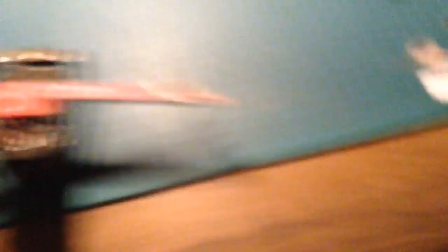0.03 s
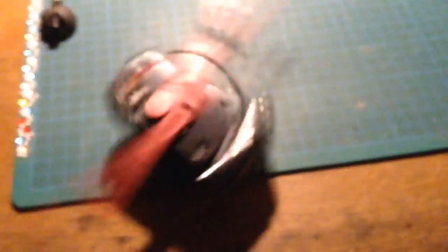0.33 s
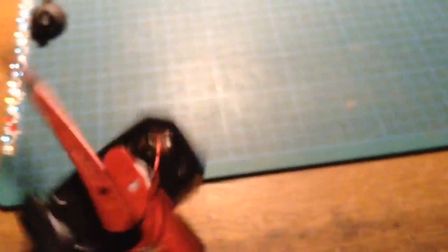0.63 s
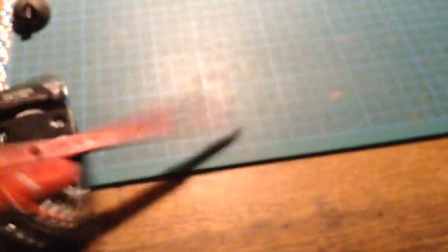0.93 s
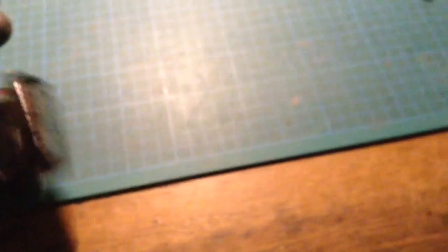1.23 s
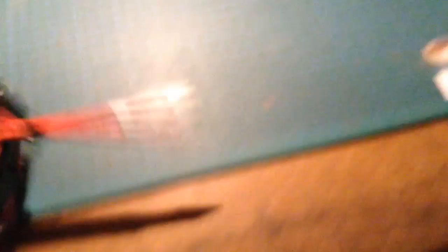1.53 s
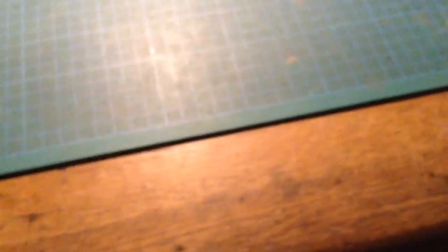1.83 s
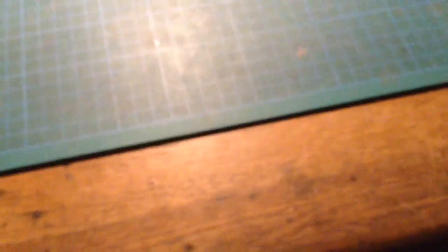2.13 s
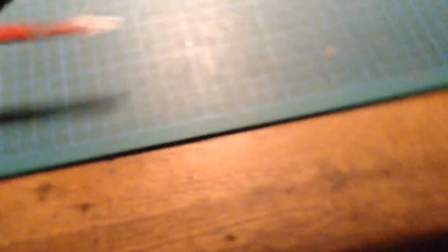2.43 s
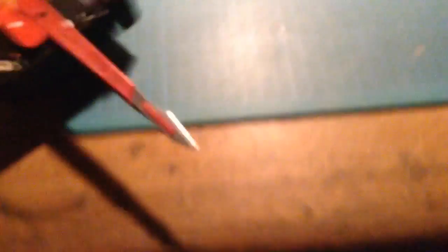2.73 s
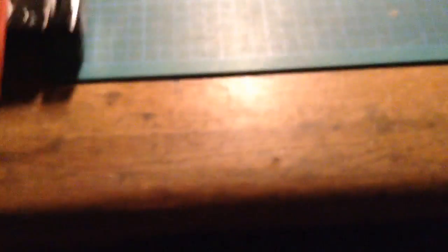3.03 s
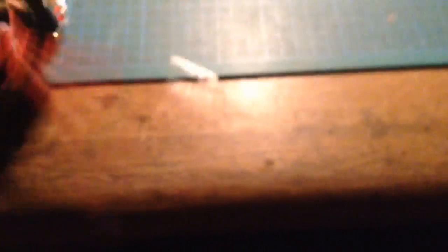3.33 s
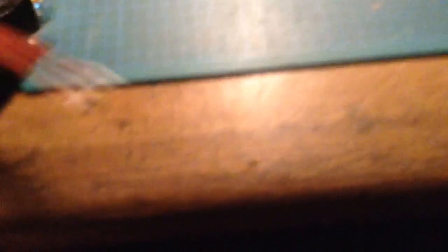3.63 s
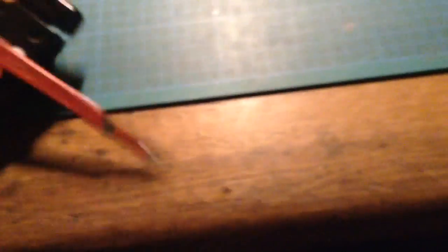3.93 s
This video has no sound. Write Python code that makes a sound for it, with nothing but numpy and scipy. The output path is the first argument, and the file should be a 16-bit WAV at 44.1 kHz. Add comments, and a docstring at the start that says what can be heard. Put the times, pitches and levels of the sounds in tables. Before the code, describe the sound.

A small motor whirrs and grinds while its plastic body knocks and clatters on a table.

```python
"""Small motor skidding on a table

A small electric motor with a plastic rotor arm spins and skids on a table, close to the microphone
in a small room. Its gears whirr and grind and its brushes fizz once a turn, the speed sagging and
recovering. The casing chatters on the table, and the arm and body knock irregularly, from dull
thumps to sharp plastic cracks."""
import sys
import numpy as np
from scipy import signal
from scipy.fft import rfft, irfft, next_fast_len
from scipy.io import wavfile
from scipy.ndimage import map_coordinates

SR = 44100
rng = np.random.default_rng(int(sys.argv[2]) if len(sys.argv) > 2 else 0)


def store_pcm(level_fs):
    """Save levels as 16-bit WAV."""
    pcm = np.round(np.clip(level_fs, -1, 1) * 32767).astype(np.int16)
    wavfile.write(sys.argv[1], SR, np.atleast_2d(pcm).T)


N = 176400


# The motor's pace. Each row: time in seconds, turns per second.
MOTOR_SPEED = [(0, 212), (.06, 210), (.12, 219), (.17, 221), (.22, 216), (.27, 204), (.31, 204), (.37, 211),
               (.44, 194), (.52, 182), (.59, 187), (.64, 178), (.73, 189), (.79, 182), (.89, 176),
               (1.04, 201), (1.19, 199), (1.25, 187), (1.33, 190), (1.44, 205), (1.5, 208), (1.61, 187),
               (1.68, 202), (1.73, 196), (1.78, 202), (1.85, 200), (1.97, 211), (2.03, 212), (2.13, 183),
               (2.2, 184), (2.3, 189), (2.45, 192), (2.69, 174), (2.77, 192), (2.89, 195), (3.0, 211),
               (3.1, 219), (3.28, 194), (3.35, 167), (3.43, 173), (3.51, 187), (3.62, 192), (3.81, 169),
               (3.92, 175), (4, 176)]
def motor_turns(flutter=.005):
    """Turns made so far by the motor, whose speed sags, recovers and flutters slightly."""
    return np.cumsum(curve(MOTOR_SPEED) * (1 + flutter * wobble(40))) / SR


# The whirr, close up. Each row: time in seconds, level in dB.
WHIRR_LEVEL = [(0.0, -41), (0.15, -42), (0.22, -40), (0.34, -39), (0.5, -33), (0.58, -37), (0.72, -37),
               (0.84, -35.5), (1.04, -40), (1.15, -38), (1.24, -39), (1.47, -34), (1.61, -35.5),
               (1.63, -43), (1.665, -43), (1.7, -36.5), (1.94, -38), (2.07, -37), (2.22, -36.5),
               (2.29, -40), (2.43, -39), (2.49, -41), (2.7, -41), (2.94, -44), (3.02, -42.5), (3.11, -38),
               (3.19, -40), (3.27, -38), (3.45, -42), (3.53, -40), (3.58, -38), (3.69, -40), (3.74, -46),
               (3.88, -48), (3.99, -46)]
# Its tone. Each row: frequency in Hz, level in dB.
WHIRR_SPECTRUM = [(100, -78), (1500, -26), (3000, -47), (4000, -6.5), (4700, 1.5), (5400, 3.5), (6300, 0.5),
                  (7600, -4.5), (8600, -12.5), (11000, -7), (16000, -13.5)]
def gear_whirr(turns, level_db=-0.5, tick_db=-9, flicker_db=2.46):
    """Gear teeth rub and tick finely in a bright whirr whose level flickers."""
    teeth = rubbing(turns, noise_share=.48, pulse_db=2)
    teeth += amp(tick_db) * ticks(per_s=73, t60=0.005)
    whirr = swirl(coloured(teeth, WHIRR_SPECTRUM), depth_db=2.5)
    return whirr * amp(curve(WHIRR_LEVEL) + level_db + flicker_db * wobble(30.3))


# The grind under the whirr. Each row: time in seconds, level in dB.
GRIND_LEVEL = [(0.0, -42), (0.27, -44), (0.47, -38), (0.65, -38), (0.73, -42), (1.09, -40), (1.19, -45),
               (1.26, -45), (1.31, -40), (1.38, -39), (1.65, -46), (1.83, -40), (2.02, -42), (2.22, -40),
               (2.37, -43), (2.62, -44), (2.93, -48), (3.28, -45), (3.51, -45), (3.6, -42), (3.86, -54),
               (3.99, -55)]
# Its tone. Each row: frequency in Hz, level in dB.
GRIND_SPECTRUM = [(60, -60), (110, -31), (150, -48), (205, 0.5), (400, -24), (900, -13.5), (1700, 4.5),
                  (2300, -4), (3000, 2.5), (3900, 5.5), (5000, -10.5), (9000, -13)]
def gear_grind(turns, level_db=2):
    """The gears also rub with a lower, rougher grind."""
    grind = coloured(rubbing(turns, noise_share=.56, pulse_db=2), GRIND_SPECTRUM)
    return swirl(grind, depth_db=4) * amp(curve(GRIND_LEVEL) + level_db)


def gear_mesh(turns, teeth=26, width_hz=800, level_db=-7, surge_db=1.5, pulse_db=3):
    """The meshing teeth rasp, pulsing each turn, in a band that rises and falls with the speed."""
    phase = 2 * np.pi * teeth * turns
    rasp = wobble(width_hz) * np.cos(phase) + wobble(width_hz) * np.sin(phase)
    swell = amp(surge_db * wobble(18) + pulse_db * np.cos(2 * np.pi * turns))
    return unit(rasp * swell) * amp(curve(WHIRR_LEVEL) + level_db)


# The brushes, close up. Each row: time in seconds, level in dB.
FIZZ_LEVEL = [(0.0, -37.5), (0.43, -38), (0.69, -45), (0.79, -39), (1.07, -37.5), (1.31, -41), (1.46, -43),
              (1.58, -52), (1.65, -43), (1.7, -38.5), (1.8, -42), (2.0, -41.5), (2.22, -39), (2.31, -42),
              (2.46, -42), (2.57, -46), (3.15, -44), (3.44, -48.5), (3.58, -39), (3.61, -40), (3.7, -59),
              (3.77, -55), (3.99, -48)]
# Their tone. Each row: frequency in Hz, level in dB.
FIZZ_SPECTRUM = [(100, -85), (3000, -17), (7000, -3.5), (9000, -7.5), (10500, -2), (12000, 1.5),
                 (13300, 4.5), (14700, 4.5), (16000, 3)]
def brush_fizz(turns, level_db=1):
    """The brushes rub over the same contacts each turn, fizzing above the gears."""
    fizz = coloured(rubbing(turns, noise_share=.34, pulse_db=0), FIZZ_SPECTRUM)
    return swirl(fizz, depth_db=2.3) * amp(curve(FIZZ_LEVEL) + level_db)


# Arm and body hitting the table near the microphone. Each row: start in seconds, level in dB, shell
# pitch in Hz, then offsets in dB for table thud, hollow knock, clack, shell ring and crack.
BLOWS = [(0.009, -18.5, 3060, -35, -19.5, -14, -13, -15), (1.824, -21.5, 3360, -36, -26, -13, -20, -24),
         (2.127, -19.5, 3200, -17, -14.5, -19, -22, -26), (2.462, -20.5, 3300, -25, -15, -16, -14, -14),
         (3.018, -25, 3540, -44, -26, -18, -14, -16), (0.446, -17.5, 3010, -16, -8.5, -30, -2, -19),
         (0.477, -12, 3350, -31, -16.5, -22, -9, -13), (0.607, -14, 3700, -30, -21, -22.5, -17, -13),
         (0.644, -11, 2940, -28, -8.5, -14.5, -11, -36), (0.662, -11, 2980, -21.5, -9.5, -14.5, -9, -24),
         (0.7, -16.5, 3520, -22, -17, -14.5, -8.5, -16), (0.719, -16, 3770, -31.5, -19, -17.5, -8, -20),
         (0.766, -16, 2920, -34, -25, -20.5, -17, -18), (0.805, -17, 3600, -43, -27, -33, -10, -14.5),
         (0.895, -10, 3110, -34, -20, -19, -7, -17.5), (1.02, -20.5, 3400, -44, -23, -24, -0.5, -16),
         (1.044, -11, 3000, -20, -4.5, -17.5, -10, -27),
         (1.061, -4.5, 2830, -19.5, -11.5, -22.5, -14.5, -23), (1.115, -18, 3420, -32, -19, -17, -14, -9.5),
         (1.274, -12, 3700, -20, -15.5, -21, -18, -30), (1.315, -6.5, 3050, -36, -23, -21.5, -15.5, -15.5),
         (1.361, -8, 3100, -21.5, -10.5, -17.5, -10, -24.5), (1.398, -10, 3500, -23, -7, -17, -11.5, -19.5),
         (1.439, -11.5, 3830, -22.5, -20, -21.5, -12, -19), (1.518, -13, 3300, -37, -22.5, -17, -16, -15),
         (1.561, -17.5, 3370, -24, -22, -16, -16, -15), (1.793, -12.5, 3770, -22.5, -22.5, -16, -18, -16.5),
         (1.883, -14, 3020, -22, -5.5, -12, -13, -42), (2.014, -15, 3970, -22, -12.5, -10, -7, -18),
         (2.055, -19.5, 3500, -25, -16, -19, -20, -20), (2.147, -9.5, 3300, -30, -19.5, -15.5, -8, -13.5),
         (2.243, -14, 3380, -32, -16, -24, -18, -15.5), (2.269, -11.5, 3240, -19, -23, -13, -8, -12.5),
         (2.3, -6, 2980, -22.5, -8.5, -19, -20, -44), (2.358, -12.5, 3670, -21, -9.5, -19, -16.5, -35),
         (2.477, -0.5, 3270, -44, -34, -25.5, -9, -13.5), (2.573, -8, 3470, -26, -19, -13, -11.5, -14.5),
         (2.628, -5, 3400, -25.5, -31, -26, -3.5, -24), (2.827, -18, 3380, -24, -24.5, -23, -31, -19),
         (2.926, -29.5, 3020, -48, -20, -16, -19, -6.5), (3.168, -27, 3480, -39, -14, -13, -12, -11),
         (3.236, -23.5, 2900, -33, -28, -15, -25, -11.5), (3.262, -23.5, 3670, -51, -15.5, -5, -20, -12),
         (3.306, -14, 3740, -36, -28, -15, -11, -16.5), (3.553, -12, 3080, -32.5, -34, -21.5, -8.5, -15),
         (3.59, -21, 2800, -26, -30, -12, -26, -31), (3.613, -16, 3770, -35, -22.5, -19, -16, -17.5),
         (3.66, -2, 3230, -32, -43, -28, -6, -13), (3.743, -23, 3480, -41, -10, -10, -10, -20),
         (3.76, -17.5, 3800, -28, -24, -19.5, -11, -17), (3.955, -23, 3120, -29, -25, -25, -7.5, -18)]
# Those five parts. Each row: low and high edge in Hz, 60 dB decay time in seconds, gain in dB.
BLOW_PARTS = [(213, 378, 0.24, -5), (383, 1124, 0.13, -7.5), (1313, 2710, 0.057, -5.5),
              (2900, 3890, 0.026, -11.5), (4450, 8220, 0.035, -4.5)]
def knocks(strike_db=16.5, room_db=-12.5, room_t60=0.12, contact_s=.002, usual_ring_hz=3270):
    """Each blow is a sharp strike and a dying clatter through the body, with a short room tail."""
    size = 13000
    out, t = np.zeros(N + size), np.arange(size) / SR
    push = np.hanning(10) / 2  # a strike lasts a fraction of a millisecond
    names = ("thud", "knock", "clack", "ring", "crack")
    for start, level_db, ring_hz, *parts_db in BLOWS:
        onset = round((start + contact_s) * SR)
        for name, part_db, (lo_hz, hi_hz, t60, gain_db) in zip(names, parts_db, BLOW_PARTS):
            decay = amp(-60 * t / t60) + amp(room_db - 60 * t / room_t60)
            burst = rng.standard_normal(size) * decay
            burst[:len(push)] += amp(strike_db) * push
            shift = ring_hz / usual_ring_hz if name == "ring" else 1  # pitch depends on the spot hit
            ring = filtered(burst, lambda f: body(f / shift))
            part = band(ring, lo_hz * shift, hi_hz * shift, order=2 if name == "thud" else 3)
            if name == "crack":  # reaches on into the top octave
                part += amp(-8.5) * band(ring, hi_hz, 20200)
            if name == "knock":
                part = amp(-5) * unit_attack(part, t) + hollow_table(t)
            out[onset:onset + size] += amp(level_db + part_db + gain_db) * unit_attack(part, t)
    return out[:N]


# Resonances of table and casing. Each row: centre in Hz, width in Hz, gain in dB.
BODY_RESONANCES = [(215, 7, -5), (265, 150, -3), (383, 18, -6), (611, 130, -9.5), (803, 130, 4.5),
                   (1030, 27, 3), (1180, 84, 3), (1660, 100, -15), (2007, 71, -4.5), (2400, 170, -3.5),
                   (3240, 190, 1.5), (4660, 910, 2.5)]
def body(f, direct_db=0.5):
    """Response of the table and casing: a direct path plus resonances."""
    return amp(direct_db) + sum(amp(db) * 1j * f * width / (hz * hz - f * f + 1j * f * width)
                                for hz, width, db in BODY_RESONANCES)


# The hollow tabletop. Each row: pitch in Hz, level in dB, 60 dB decay time in seconds.
TABLE_MODES = [(395, -8, .13), (560, -1, .11), (710, -13, .11), (990, -11, .05)]
def hollow_table(t, rise_s=.0012):
    """The table's low modes ring, struck a little differently every time."""
    ring = np.zeros(len(t))
    for hz, db, t60 in TABLE_MODES:
        decay = amp(db + rng.normal(0, 1.8) - 60 * t / t60)
        pitch_hz = hz * (1 + .015 * rng.standard_normal())
        ring += decay * 2 * np.cos(2 * np.pi * pitch_hz * t)
    return band(ring * (1 - np.exp(-t / rise_s)), 257, 2800, order=2)


# The casing against the tabletop. Each row: time in seconds, level in dB.
CHATTER_LEVEL = [(0.0, -47), (0.1, -54), (0.2, -57), (0.33, -53), (0.48, -47), (0.56, -52), (0.67, -45),
                 (0.79, -58), (0.88, -63), (0.99, -55), (1.08, -46), (1.18, -52), (1.25, -54), (1.4, -44),
                 (1.46, -47), (1.65, -57), (1.76, -60), (1.86, -49), (2.23, -49), (2.33, -44), (2.44, -52),
                 (2.64, -48), (2.7, -53), (2.84, -51), (3.01, -55), (3.28, -50), (3.35, -56), (3.54, -55),
                 (3.59, -50), (3.71, -53), (3.88, -60), (3.99, -61)]
# Its tone. Each row: frequency in Hz, level in dB.
CHATTER_SPECTRUM = [(30, -55), (60, -24), (90, -10.5), (150, -2), (220, -1.5), (300, 3.5), (450, -15),
                    (600, 1), (800, 4.5), (1300, -1.5), (2000, -1.5), (3500, -14), (8000, -36),
                    (16000, -43)]
def casing_chatter(turns, level_db=4.5, buzz_db=-4):
    """The shaking casing patters and buzzes on the table."""
    patter = ticks(per_s=55, t60=0.061)
    buzz = amp(buzz_db) * rubbing(turns, noise_share=0.9, pulse_db=-1.5)
    return coloured(patter + buzz, CHATTER_SPECTRUM) * amp(curve(CHATTER_LEVEL) + level_db)


# Skids across the table. Each row: start in seconds, length in seconds, level in dB, squeal in Hz.
SCRAPES = [(0.0, 0.033, -41, 2400), (0.15, 0.063, -36.5, 2830), (0.326, 0.018, -37, 1690),
           (0.484, 0.048, -33, 3100), (0.802, 0.11, -39, 3630), (2.262, 0.0081, -29, 5600),
           (3.1, 0.033, -34, 5660), (3.514, 0.036, -35.5, 4900)]
def skids(turns, half_width=0.05, fade_s=0.0019):
    """Short scrapes: friction, pulsing with the motor, in a resonance of the shell."""
    out, t = np.zeros(N), np.arange(N) / SR
    for start, length, db, hz in SCRAPES:
        friction = rubbing(turns, noise_share=0.45, pulse_db=-1)
        scrape = unit(band(friction, hz * (1 - half_width), hz * (1 + half_width), order=1))
        gate = np.clip(np.minimum(t - start, start + length - t) / fade_s, 0, 1)
        out += amp(db) * scrape * gate
    return out


# Loose plastic, faint behind the gears. Each row: frequency in Hz, level in dB.
RATTLE_SPECTRUM = [(300, -42), (800, -4.5), (1700, 0), (3000, 1), (5500, 8), (9000, 9), (16000, -10)]
def plastic_rattle(level_db=-5):
    """Loose plastic parts tick finely and densely as the gears shake them."""
    clicks = filtered(ticks(per_s=130, t60=0.008), body)
    return coloured(clicks, RATTLE_SPECTRUM) * amp(curve(GRIND_LEVEL) + level_db)


# Bumps low in the background. Each row: start in seconds, level in dB, pitch in Hz.
SOFT_BUMPS = [(0.182, -48.5, 215), (0.732, -36.5, 255.2), (0.903, -43, 270), (2.577, -30, 214),
              (2.64, -37.5, 265), (3.441, -42, 359), (3.693, -41.5, 263)]
def rocking_bumps(rise_s=0.0034, t60=0.2, waver_rad=0.88):
    """Soft, low, wavering bumps as the casing rocks on the table."""
    out = np.zeros(N)
    for start, db, hz in SOFT_BUMPS:
        t = np.maximum(np.arange(N) / SR - start, 0)
        envelope = amp(db - 60 * t / t60) * (1 - np.exp(-t / rise_s))
        out += envelope * 2 * np.sin(2 * np.pi * hz * t + waver_rad * wobble(90))
    return out


def rubbing(turns, noise_share, pulse_db, pole_db=4, uneven_db=4, renewals_per_s=28):
    """A random contact pattern repeats each turn and evolves; three poles lift every third order."""
    count, size = 100, 4096
    order = np.arange(count)
    weight = amp(pole_db * (order % 3 == 0)) * (order > 0)
    draws = rng.standard_normal((count, count, 3))
    phases = np.arctan2(draws[..., 0], draws[..., 1])
    patterns = irfft(weight * amp(uneven_db * draws[..., 2]) * np.exp(1j * phases), size)
    position = [np.arange(N) / SR * renewals_per_s, turns % 1 * size]
    repeating = unit(map_coordinates(patterns, position, order=2, mode="grid-wrap"))
    friction = np.sqrt(1 - noise_share) * repeating + np.sqrt(noise_share) * rng.standard_normal(N)
    return friction * amp(pulse_db * np.cos(2 * np.pi * turns))


def ticks(per_s, t60, spread_db=6):
    """A random run of tiny contacts, each a decaying burst of noise."""
    hits = (rng.random(N) < per_s / SR) * amp(spread_db * np.clip(rng.standard_normal(N), -2, 2))
    power = signal.lfilter([1], [1, -amp(-120 / (t60 * SR))], hits ** 2)
    return unit(np.sqrt(power) * rng.standard_normal(N))


def swirl(x, depth_db, spin_hz=2.7, reflection=0.21, patch_hz=594, patch_s=.09):
    """As the machine spins, its table reflection shifts and different bands face the microphone."""
    n = np.arange(N)
    spin = 2 * np.pi * spin_hz * n / SR + wobble(1.6)
    delay_s = 0.000308 * (1 + 0.39 * np.sin(spin))
    x = x + reflection * map_coordinates(x, [n - SR * delay_s])
    spectra = signal.stft(x, nperseg=512)[2]
    bins, frames = np.indices(spectra.shape)
    patch = [bins * SR / 512 / patch_hz, frames * 256 / SR / patch_s]
    swells = map_coordinates(rng.standard_normal((64, 128)), patch, mode="wrap")
    return unit(signal.istft(spectra * amp(depth_db * swells), nperseg=512)[1][:N])


def amp(db):
    """Decibels to gain."""
    return 10 ** (np.asarray(db) / 20)


def unit(x):
    """Scale to rms 1."""
    return x / np.sqrt(np.mean(x ** 2) + 1e-20)


def unit_attack(x, t, span_s=0.022):
    """Scale a ring so that its first moments have level 1."""
    return x / np.sqrt(np.sum(x ** 2 * np.exp(-(t / span_s) ** 2)) / (span_s * SR))


def curve(rows):
    """One value per sample from (seconds, value) rows."""
    return np.interp(np.arange(N) / SR, *np.transpose(rows))


def wobble(rate):
    """A smooth random curve, rate knots a second."""
    return map_coordinates(rng.standard_normal(5000), [np.arange(N) * rate / SR], mode="wrap")


def filtered(x, response):
    """x through a gain given as a function of Hz."""
    size = next_fast_len(len(x) + 8192)
    return irfft(rfft(x, size) * response(np.fft.rfftfreq(size, 1 / SR)), size)[:len(x)]


def coloured(x, points):
    """x through a (Hz, dB) spectrum, at rms 1."""
    hz, db = np.transpose(points)
    return unit(filtered(x, lambda f: amp(np.interp(np.log(f + 1), np.log(hz), db))))


def band(x, lo_hz, hi_hz, order=3):
    """Causal band-pass."""
    edges = [lo_hz, min(hi_hz, SR / 2 - 100)]
    return signal.sosfilt(signal.butter(order, edges, "band", fs=SR, output="sos"), x)


def scene():
    """At one close microphone: one speed drives motor, chatter and skids; knocks and bumps on top."""
    turns = motor_turns()
    motor = gear_grind(turns) + gear_whirr(turns) + brush_fizz(turns) + gear_mesh(turns)
    casing = plastic_rattle() + casing_chatter(turns) + skids(turns)
    return (motor + casing + knocks() + rocking_bumps())[None]


def record(dry, low_cut_hz=60, top_hz=15500):
    """The recorder clips at full scale, sheds the deepest bass and keeps nothing above top_hz."""
    low_cut = signal.butter(2, low_cut_hz, "high", fs=SR, output="sos")
    clipped = signal.sosfilt(low_cut, np.clip(dry[0], -1, 1))
    return filtered(clipped, lambda f: f < top_hz)[None]


dry = scene()
out = record(dry)
store_pcm(out)
```